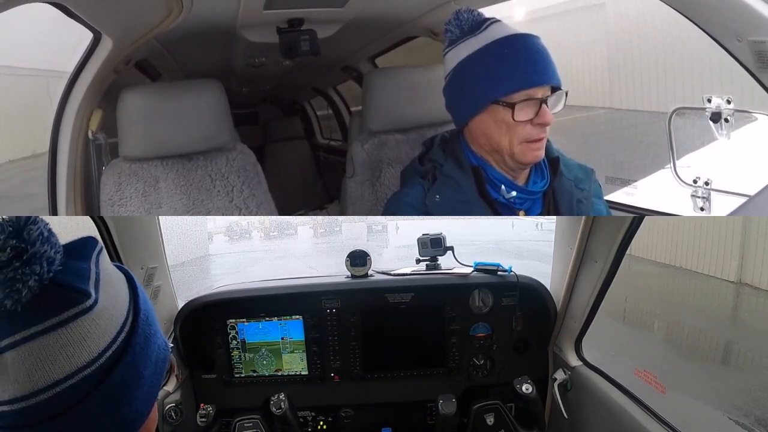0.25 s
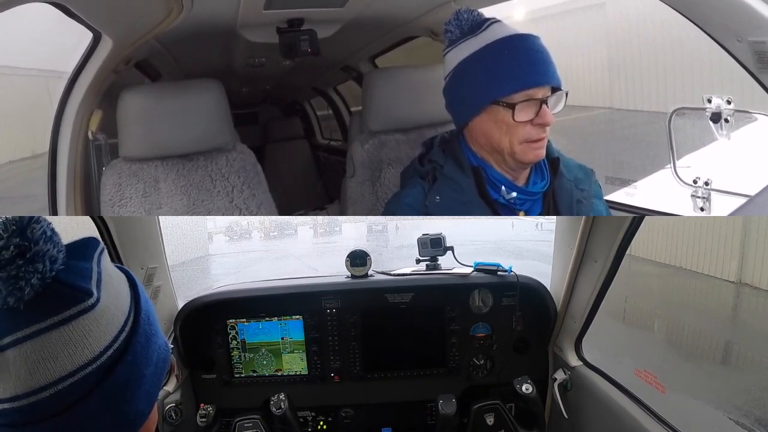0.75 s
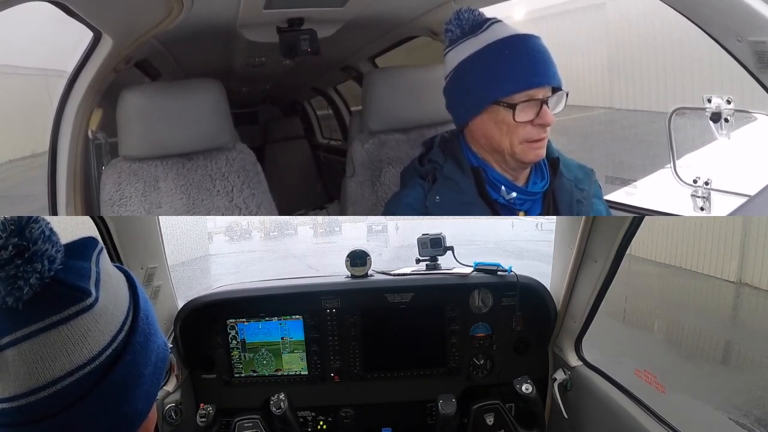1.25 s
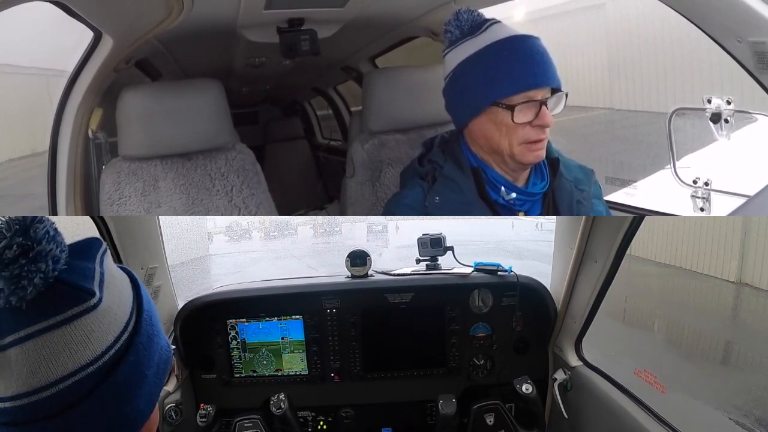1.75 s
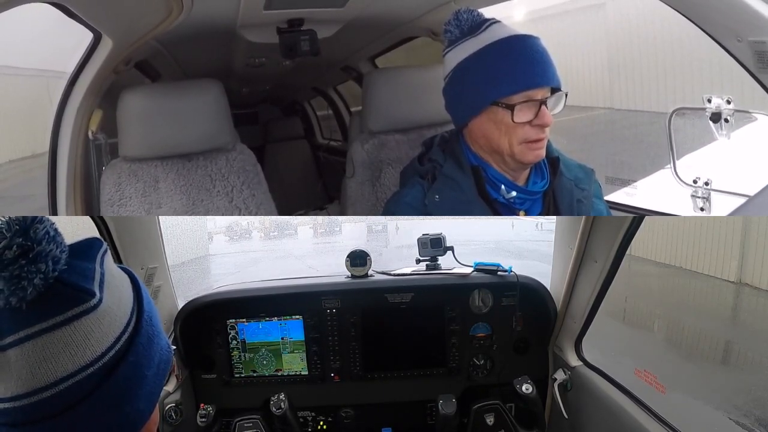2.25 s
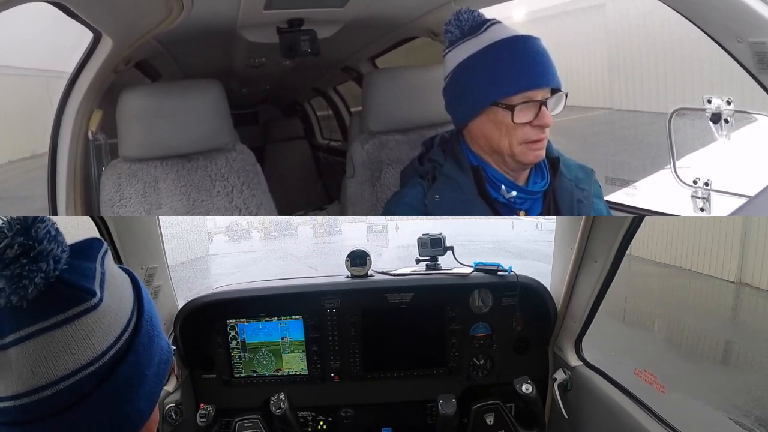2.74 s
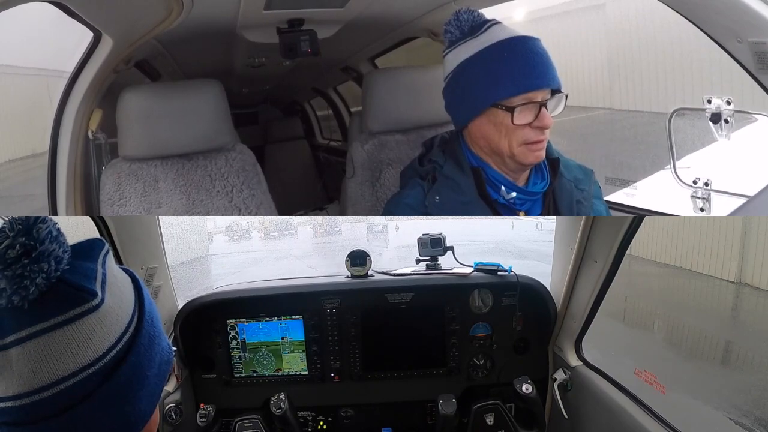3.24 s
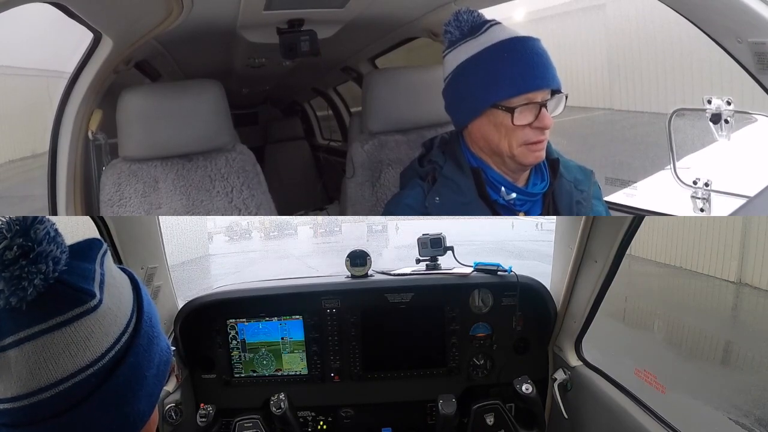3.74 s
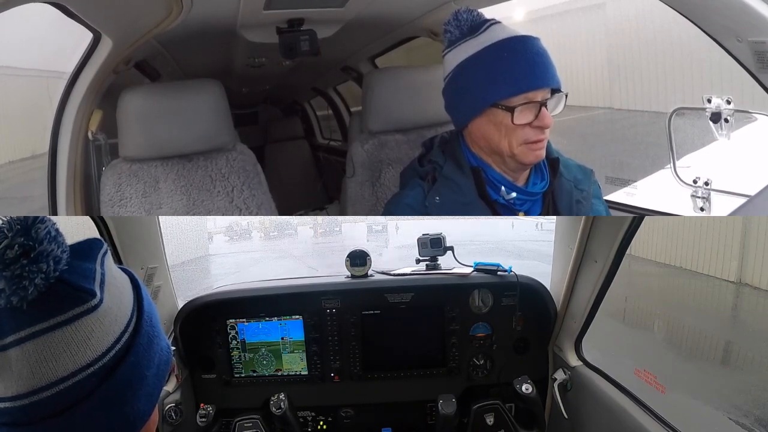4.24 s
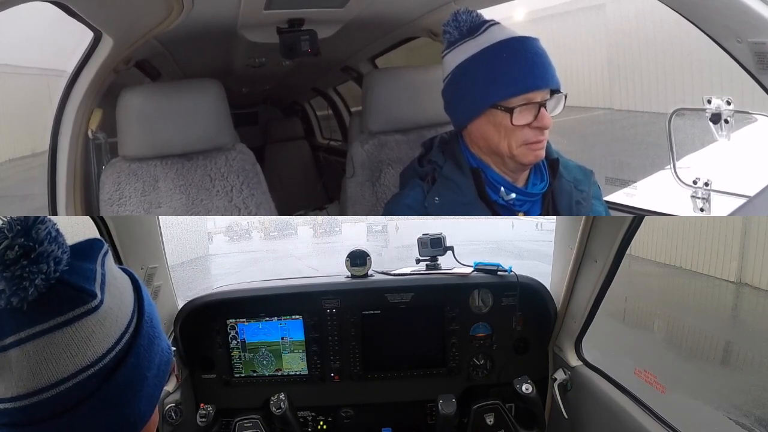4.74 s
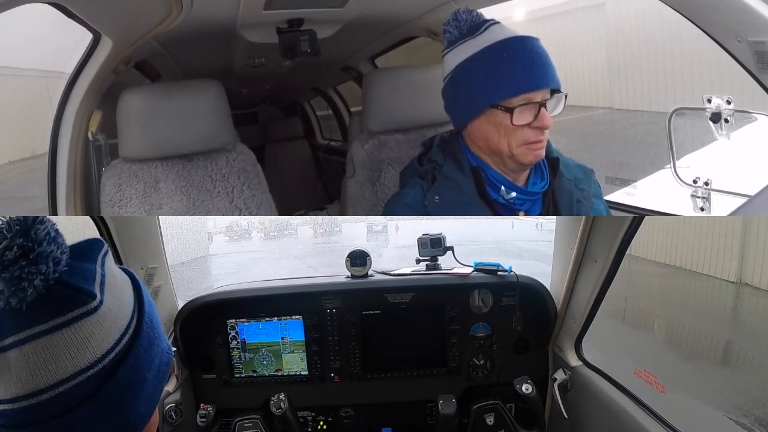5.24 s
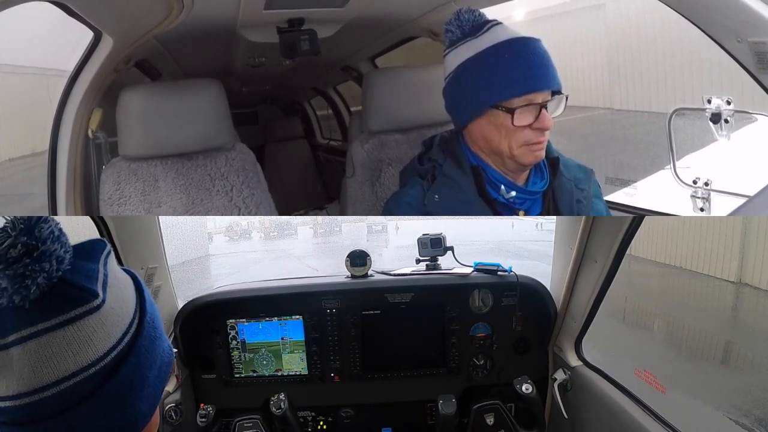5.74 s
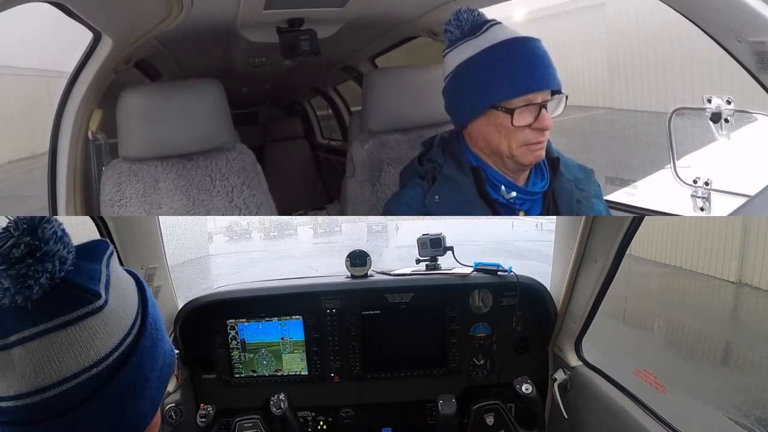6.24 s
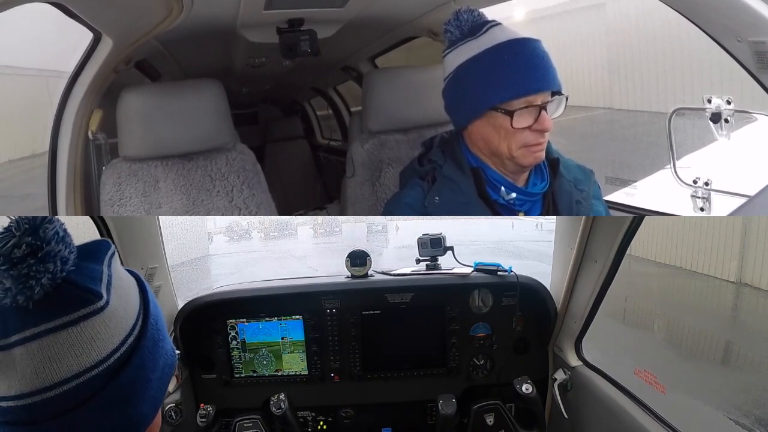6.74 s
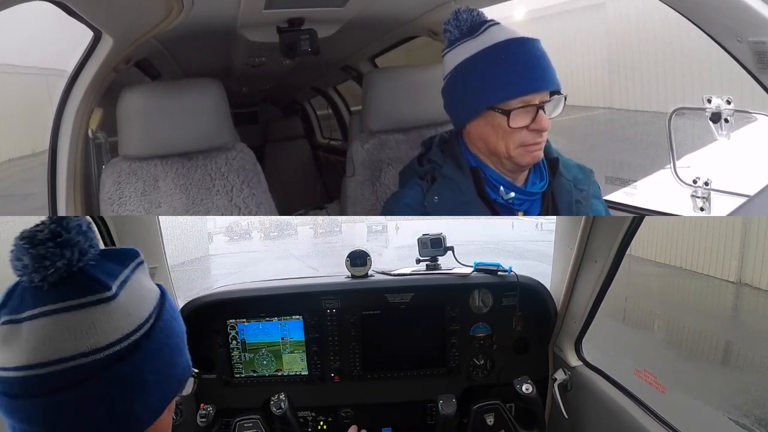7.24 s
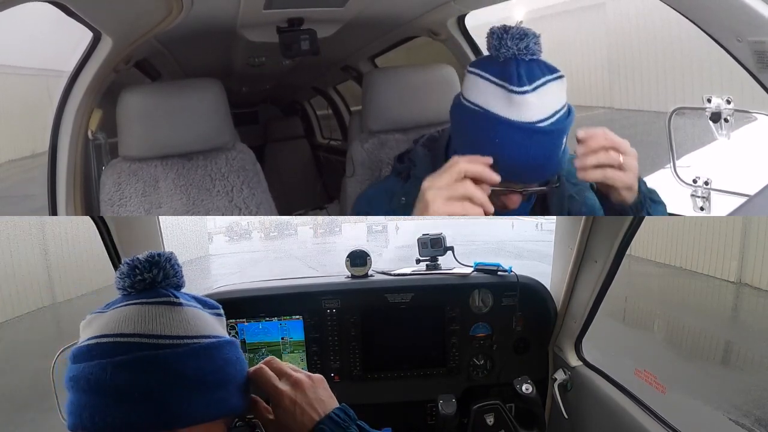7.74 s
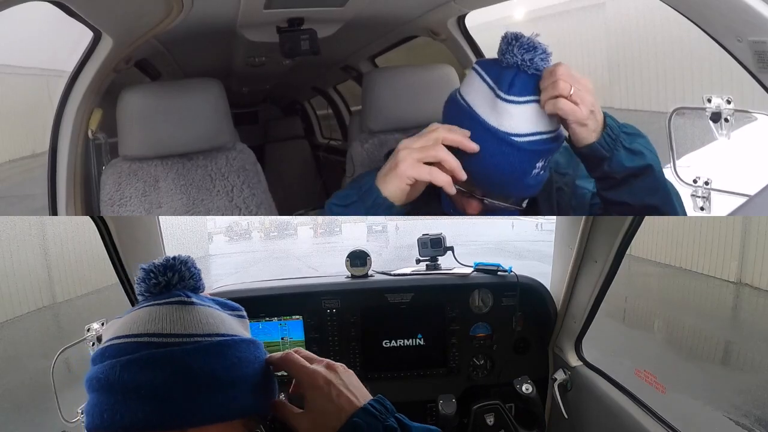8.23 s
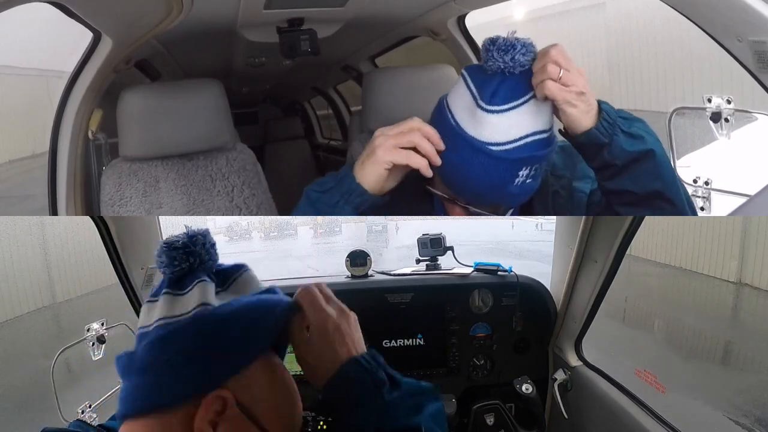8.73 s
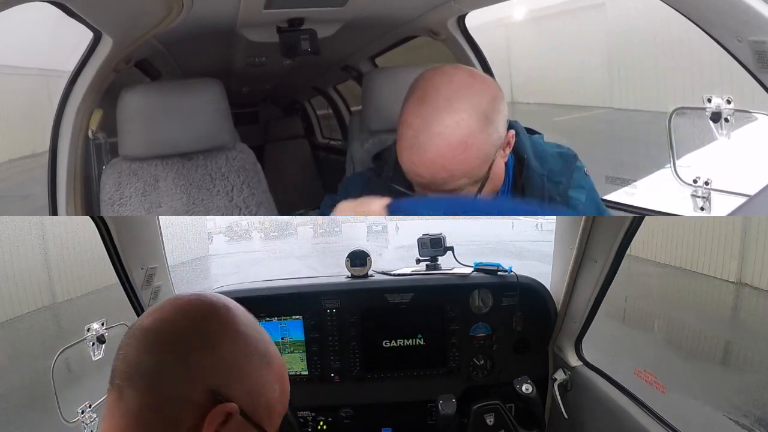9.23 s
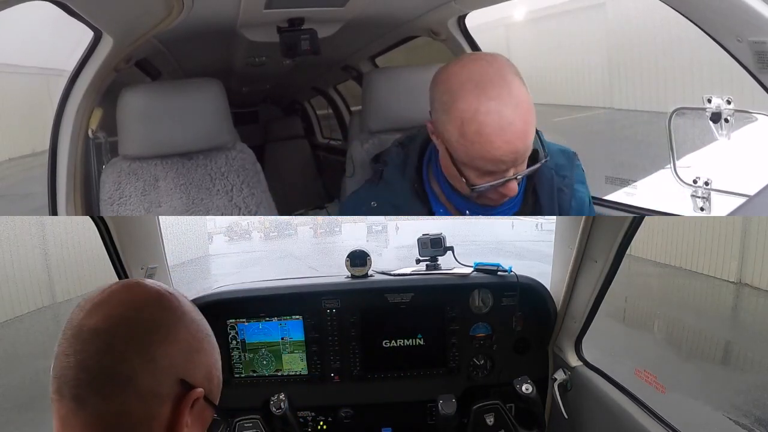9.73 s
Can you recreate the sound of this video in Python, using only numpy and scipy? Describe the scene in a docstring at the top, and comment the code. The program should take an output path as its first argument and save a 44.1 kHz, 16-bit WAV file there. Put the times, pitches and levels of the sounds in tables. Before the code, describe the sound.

Low, lumpy piston engine idle with propeller wash heard from a small plane's cabin, panels humming and rattling, with slight clothing rustles near the end.

```python
"""An uneven engine throb that repeats every twelve beats: a cold six-cylinder aircraft engine idles in a closed cockpit.
One cylinder skips every second cycle and a lazy one catches only now and then: orders of the beat plus single thumps.
Propeller wash and exhaust roar are shaped noise; panels, cabin air, trim and floor pan ring as resonances.
Loose things buzz as noise; short bright ticks are decaying sines; a nylon jacket rustles as grainy noise;
a touched knob clicks. Heard at two close microphone ports."""
import sys
import numpy as np
from scipy import signal
from scipy.fft import rfft, irfft, next_fast_len
from scipy.io import wavfile
from scipy.ndimage import uniform_filter1d, map_coordinates

SR = 44100
rng = np.random.default_rng(int(sys.argv[2]) if len(sys.argv) > 2 else 0)


def master_out(mix):
    """Clip the mix to full scale and print it as 16-bit PCM to the path in sys.argv[1]."""
    frames = np.transpose(np.atleast_2d(mix))
    ceiling = np.clip(frames, -1, 1)
    pcm = np.round(ceiling * 32767).astype(np.int16)
    wavfile.write(sys.argv[1], SR, pcm)


N = 440118


def amp(db):
    """Gain of a level in dB."""
    return 10 ** (np.asarray(db) / 20)


def unit(x):
    """x at rms 1."""
    return x / np.sqrt(np.mean(x ** 2) + 1e-20)


def along(points, hz):
    """(Hz, value) points interpolated on a log frequency axis."""
    f, v = np.transpose(points)
    return np.interp(np.log(hz + 1), np.log(f + 1), v)


def curves(rows):
    """One value per sample for each column after the time."""
    s, *cols = np.transpose(rows)
    return [np.interp(np.arange(N) / SR, s, c) for c in cols]


def wobble(rate_hz, size=1):
    """Smooth random curve, rate_hz (up to 40) knots a second, read every size samples."""
    knots = rng.standard_normal(int(N * 40 / SR) + 4)
    coarse = np.arange(0, N + 64, 64)
    curve = map_coordinates(knots, [coarse * min(rate_hz, 40) / SR])
    return np.interp(np.arange(0, N, size), coarse, curve)


def filtered(x, response):
    """x times a complex response of frequency; mirrored ends keep the edges free of steps."""
    edge = 4096
    x = np.pad(x, [(0, 0)] * (x.ndim - 1) + [(edge, edge)], mode="reflect")
    m = next_fast_len(x.shape[-1])
    spectrum = rfft(x, m) * response(np.fft.rfftfreq(m, 1 / SR))
    return irfft(spectrum, m)[..., edge:edge + N]


def modes(table):
    """Causal response of (center [Hz], width [Hz], level [dB]) resonances, alternating in sign."""
    def response(f):
        total = 0
        for k, (center, width, db) in enumerate(table):
            resonance = 1j * f * width / (center * center - f * f + 1j * f * width)
            total = total + (-1) ** k * amp(db) * resonance
        return total
    return response


# Left-right likeness of noise: (frequency [Hz], correlation [-1..1])
LIKENESS = [(130, 0.99), (300, 1), (640, 0.95), (1400, 0.9), (2500, 0.31), (6000, 0.34), (15000, 0.24)]


def rush(gain, noise=None):
    """Stereo noise of rms 1: alike at both ports in the bass, mostly unrelated in the treble."""
    def mid_side_gain(hz):
        turn = np.arccos(np.clip(along(LIKENESS, hz), -1, 1)) / 2
        return gain(hz) * [np.cos(turn), np.sin(turn)]
    noise = rng.standard_normal((2, N)) if noise is None else noise
    mid, side = filtered(noise, mid_side_gain)
    return unit(np.array([mid + side, mid - side]))


# Engine beat rate: (time [s], rate [beats/s])
BEAT_RATE = [(0, 52.42), (1.4, 52.503), (2, 52.835), (3.3, 52.336), (5, 50.744), (7.3, 49.49),
             (8.6, 49.223), (10, 49.698)]
START_BEAT = -.43


def engine_beats():
    """Integrates the beat rate into a running beat count; returns (beat, beats per second)."""
    speed_hz = curves(BEAT_RATE)[0]
    return START_BEAT + np.cumsum(speed_hz) / SR, speed_hz


# Firing pattern over two engine cycles: one entry per beat, 1 = always fires [0 or 1]
FIRES = [0, 1, 1, 0, 1, 1, 1, 1, 1, 0, 1, 1]
PAIR_BEATS, CYCLE_BEATS = len(FIRES), 6
# Hole left by one missing firing: (frequency [Hz], rms level per unit pattern weight [dB])
MISSING_FIRING = [(17, -34), (21, -43), (26, -38), (31, -32.5), (44, -32), (50, -35), (63, -32),
                  (68, -40.5), (75, -42), (85, -48), (100, -49)]
# Whole multiples of the beat as the cabin passes them: (frequency [Hz], rms level [dB])
BEAT_ORDERS = [(49, -19), (53, -18), (99, -25), (105, -34), (148, -42), (154, -39), (158, -42), (198, -44),
               (210, -46), (250, -53), (262, -59), (298, -52), (315, -56), (348, -59), (367, -52),
               (395, -54), (420, -53), (470, -58), (545, -65), (592, -58), (630, -61), (650, -63),
               (690, -69), (735, -62), (745, -55), (756, -58), (770, -64), (788, -55)]
# Orders halfway between beats, as alternate cylinder banks differ: (frequency [Hz], rms level [dB])
HALF_ORDERS = [(74, -27), (79, -31), (124, -44), (131, -43), (173, -59), (184, -53), (222, -60), (236, -52)]
# Missing firings and catches grow with speed about the reference rate.
EFFORT_DB_PER_HZ, REFERENCE_HZ = .6, 51


def throb(beat, speed_hz):
    """Engine orders; the firing pattern sets the size and sign of those between whole and half beats."""
    step = 8
    beat, speed_hz = beat[::step], speed_hz[::step]
    effort_db = EFFORT_DB_PER_HZ * (speed_hz - REFERENCE_HZ)
    pattern = np.fft.fft(FIRES).real
    orders = [k for k in range(4, 24) if k % PAIR_BEATS]
    orders += [30, 42, 54] + [PAIR_BEATS * k for k in range(1, 16)]
    out = np.zeros(len(beat))
    for order in orders:
        multiple, place = order / PAIR_BEATS, order % PAIR_BEATS
        hz = multiple * speed_hz
        if place == 0:
            steady = amp(along(BEAT_ORDERS, hz))
        elif place == PAIR_BEATS // 2 and multiple > 1:
            steady = amp(along(HALF_ORDERS, hz))
        else:
            steady = pattern[place] * amp(along(MISSING_FIRING, hz) + effort_db)
        level = steady * amp(.4 * np.sqrt(multiple) * wobble(2.5, size=step))
        trail_rad = .45 * (multiple - 1) ** 2 if multiple % 1 == 0 else 3.5 / order
        lag_rad = trail_rad + .03 * multiple * wobble(3, size=step)
        out += np.sqrt(2) * level * np.cos(2 * np.pi * multiple * beat - lag_rad)
    return signal.resample_poly(out, step, 1, padtype="line")[:N]


# Cycles in which the lazy cylinder catches: cycle index [engine cycles]
CATCHES = [1, 3, 5, 6, 8, 10, 12, 14, 15, 17, 19, 21, 23, 25, 26, 27, 30, 32, 33, 35, 37, 39, 40, 42, 43,
           45, 47, 50, 53, 56, 59, 61, 64, 66, 67, 69, 71, 73, 76, 78, 80, 82, 84]
# Weaker catches: (cycle index [engine cycles], level relative to a full catch [dB])
PARTIAL_CATCHES = [(5, -11), (14, -10), (26, -9), (32, -3), (39, -7), (42, -3), (66, -2)]
LAZY_BEAT = 3  # place in the engine cycle
CATCH_DB = -8.3  # full catch at the reference rate


def unevenness(beat, speed_hz):
    """Each beat gets a push of chance size; a catch of the lazy cylinder adds one swing of cabin air."""
    push = rng.standard_normal(600)[np.round(beat).astype(int)] * np.cos(np.pi * beat) ** 2
    pushes = amp(-36) * unit(filtered(push, lambda hz: hz ** 2 / (hz ** 2 + 30 ** 2)))
    at = np.searchsorted(beat, LAZY_BEAT + CYCLE_BEATS * np.array(CATCHES))
    partial_db = np.array([dict(PARTIAL_CATCHES).get(k, 0) for k in CATCHES])
    effort_db = EFFORT_DB_PER_HZ * (speed_hz[at] - REFERENCE_HZ)
    impulses = np.bincount(at, amp(CATCH_DB + effort_db + partial_db), N)
    t = np.arange(-.04, .04, 1 / SR)
    thump = np.exp(-(t / .0123) ** 2) * np.cos(2 * np.pi * 48 * t - .5)
    return pushes + signal.fftconvolve(impulses, thump, "same")


# Roar power that returns with every pair of engine cycles: (frequency [Hz], share [0..1])
RETURN_SHARE = [(40, 0), (90, .45), (140, .5), (200, .4), (400, .4), (560, .27), (800, .13), (1100, .1),
                (1800, 0)]
RENEW_S = 3


def returning(beat):
    """Two white noises of which a share repeats with every pair of engine cycles, slowly renewed."""
    cells = 2048
    pairs, age = beat / PAIR_BEATS, np.arange(N) / SR / RENEW_S
    patterns = rng.standard_normal((2, int(age[-1]) + 2, cells))
    cell, old = (pairs % 1 * cells).astype(int), age.astype(int)
    turn = np.pi / 2 * (age % 1)  # equal-power crossfade to the next pattern
    again = np.cos(turn) * patterns[:, old, cell] + np.sin(turn) * patterns[:, old + 1, cell]
    again = again * np.sqrt(cells * (pairs[-1] - pairs[0]) / N)  # held cells to white-noise density
    repeated = filtered(again, lambda hz: np.sqrt(along(RETURN_SHARE, hz)))
    fresh = rng.standard_normal((2, N))
    return repeated + filtered(fresh, lambda hz: np.sqrt(1 - along(RETURN_SHARE, hz)))


# Roar course: (time [s], level [dB])
ROAR_LEVEL = [(0, -36.5), (3.45, -36.5), (3.85, -38.5), (5, -38.5), (6.1, -36.5), (6.9, -38), (7.6, -37),
              (9.2, -38.5)]
# Spectrum of propeller wash and roar: (frequency [Hz], relative density [dB per Hz])
WASH_SPECTRUM = [(3, -11), (8, 2), (12, -1), (20, -22.5), (45, -23), (70, -26), (95, -19), (117, -31),
                 (140, -27), (170, -34), (200, -30), (260, -31.5), (400, -33), (680, -42), (1000, -46),
                 (1250, -52), (2000, -59.5)]
# Panel resonances: (center [Hz], width [Hz], relative density [dB])
PANEL_MODES = [(607, 30, -1.5), (726, 30, -4.5), (814, 18.5, 1.5), (951, 7.4, 2.5), (1048, 20.4, -3),
               (1072, 9.7, 1), (1125, 13.4, -10.5), (1472, 30, -13.5)]
# Air modes of the cabin: (center [Hz], width [Hz], relative level [dB])
CABIN_MODES = [(151.4, 19, 4), (207.8, 9.5, 4.5), (294, 15, -3.5), (368, 25, -2)]


def roar_swing_db():
    """Deviation of the roar course from its mean in dB."""
    roar_db = curves(ROAR_LEVEL)[0]
    return roar_db - roar_db.mean()


def roar(beat):
    """Wash noise under a roar and panel hum that swell with the beat; cabin air booms along."""
    level = amp(curves(ROAR_LEVEL)[0] + 0.63 * wobble(9))
    swell_db = 1.35 * np.cos(2 * np.pi * (beat - .6))
    swell_db += 1.22 * np.cos(2 * np.pi * (beat - .9) / 3)
    swell_db += 0.22 * np.cos(2 * np.pi * (beat - .9) / CYCLE_BEATS)
    body_spectrum = WASH_SPECTRUM + [(4000, -79), (16000, -110)]

    def low(hz):  # power split between wash and roar body
        return 1 / (1 + (hz / 130) ** 6)

    def boom_gain(hz):
        return modes(CABIN_MODES)(hz) * hz ** 2 / (hz ** 2 + 120 ** 2)

    wash = rush(lambda hz: amp(along(WASH_SPECTRUM, hz)) * np.sqrt(low(hz)), returning(beat))
    body = rush(lambda hz: amp(along(body_spectrum, hz)) * np.sqrt(1 - low(hz)), returning(beat))
    drive = returning(beat)
    hum = np.zeros((2, N))
    for mode in PANEL_MODES:
        _, width_hz, db = mode
        hum += amp(db + 0.97 * wobble(4)) * np.sqrt(width_hz) * rush(modes([mode]), drive)
    hum = unit(hum)
    boom = rush(boom_gain, drive)
    swelling = amp(swell_db) * (amp(0.01) * body + amp(-11.5) * hum)
    return amp(-19.0) * wash + level * (amp(-7.0) * boom + swelling)


# Jolts within two engine cycles: (place [beats], nominal strength [dB])
JOLTS = [(1.7, 19.5), (4.6, 17), (5.4, 8), (8.5, 15), (10.6, 11.5)]


def jolts(beat):
    """dB by which jolts stir loose things: quick rise, slower fade, new strength every time."""
    stir_db = np.zeros(N)
    for at, db in JOLTS:
        chance = rng.uniform(.4, 1.4, 64)[((beat - at) // PAIR_BEATS).astype(int) + 2]
        stir_db += db * chance * np.exp(-((beat - at) % PAIR_BEATS) / 1.17)
    return uniform_filter1d(stir_db, size=350)


# Sizzle spectrum: (frequency [Hz], relative density [dB per Hz])
SIZZLE_SPECTRUM = [(880, -27), (1500, -15), (1550, -26), (2020, -11), (3610, -11), (4100, -12.5),
                   (6980, -11), (8590, -12.5), (14600, -27), (15800, -42)]
# Loose trim resonances: (center [Hz], width [Hz], relative level [dB])
TRIM_MODES = [(1446, 57, -5.5), (1815, 62, -10), (2463, 55, -12.5), (2630, 80, -12), (2930, 210, -11.5),
              (3500, 500, -8.5), (5110, 710, -10.5), (7560, 300, -29), (8400, 280, -15.5)]
BUZZ_DB, BUZZ_FOLLOWS = -59, 0.74  # base level; share of the roar's dB swings followed


def buzz(beat):
    """Sizzle noise stirred by jolts in the treble, and chatter: bursts that each excite one trim mode."""
    level = amp(BUZZ_DB + BUZZ_FOLLOWS * roar_swing_db())
    stir_db = jolts(beat)

    def high(hz):
        return 0.26 / (1 + (4500 / (hz + 1)) ** 4) / (1 + (hz / 11500) ** 4)

    sizzle = rush(lambda hz: amp(along(SIZZLE_SPECTRUM, hz)))
    sizzle = sizzle + (amp(stir_db) - 1) * filtered(sizzle, high)
    chatter = np.zeros((2, N))
    for mode in TRIM_MODES:
        bursts = amp(.5 * stir_db + 8.7 * np.tanh(wobble(30)))
        chatter += amp(mode[2]) * bursts * rush(modes([mode]))
    return level * (sizzle + amp(-3.5) * chatter)


# Loudest exhaust blows of two engine cycles: (place [beats], impulse level [dB])
BLOWS = [(1.7, 10), (4.4, 16), (6.4, 9), (7.4, 13), (8.8, 10), (10.6, 16)]
# Floor pan over the exhaust: (center [Hz], width [Hz], level [dB])
FLOOR_MODES = [(205, 22, 0), (290, 25, -4), (375, 35, -6), (560, 70, -15)]
BLOW_SCATTER_DB, BLOW_SCATTER_BEATS = 2, .02


def barks(beat):
    """Stronger cylinders thump the floor pan at their place in each cycle pair, following the roar level."""
    at, db = np.transpose(BLOWS)
    starts = PAIR_BEATS * np.arange(beat[-1] // PAIR_BEATS)[:, None]
    chance = rng.standard_normal((2, len(starts), len(at)))
    where = np.searchsorted(beat, starts + at + BLOW_SCATTER_BEATS * chance[0])
    strength = amp(db + BLOW_SCATTER_DB * chance[1])
    blows = np.bincount(where.ravel(), strength.ravel(), N)[:N]

    def floor_gain(hz):
        return modes(FLOOR_MODES)(hz) * (1j * hz / (170 + 1j * hz)) ** 2

    return filtered(blows * amp(roar_swing_db()), floor_gain)


# Short bright ticks: a loose part, and at 9.76 s likely the nylon jacket:
# (time [s], level [dB], brightness [dB per octave])
TICK_EVENTS = [(0.0440, -46, -5), (0.2706, -40, -9), (0.5021, -42, -9), (1.5885, -37, -6),
               (1.8704, -45, -6), (2.1014, -44, -6), (2.5544, -38.5, -6), (2.7819, -38, -8),
               (3.267, -32, -2), (3.669, -43, 1), (4.1657, -43, -7), (4.5952, -33, -1), (4.596, -30, -20),
               (5.129, -34, 0), (5.3368, -36.5, -5), (5.619, -41, -14), (6.02, -38.5, 0), (6.2939, -44, 1),
               (7.042, -30, 2), (7.2568, -43, -8), (7.7092, -42, -5), (8.227, -46, -6), (8.7128, -40, -6),
               (9.4567, -42, -3), (9.6538, -36, -6), (9.7595, -39, 5), (9.764, -40, 10)]
# Ring of a tick: (frequency [Hz], level [dB], t60 [s])
TICK_RING = [(6500, -8, .005), (7300, -3, .006), (8100, 0, .006), (8900, 0, .005), (10100, -7, .004),
             (11500, -4, .005), (13400, -7, .004), (14800, -12, .003)]
TICK_MIDDLE_HZ = 8100  # brightness pivot
RATTLE_DB, RATTLE_T60_S, RATTLE_HZ, RATTLE_WIDTH_HZ = -7, .09, 8000, 4000


def ticks():
    """Each tick rings as decaying sines and leaves a faint band of decaying noise."""
    ring, rattle = np.zeros((2, N + SR)), np.zeros((2, N + SR))
    t = np.arange(SR // 10) / SR
    attack = 1 - np.exp(-t / 0.00025)
    for s, db, bright in TICK_EVENTS:
        span = slice(round(s * SR), round(s * SR) + len(t))
        for hz, level_db, t60_s in TICK_RING:
            phase = rng.uniform(0, 2 * np.pi) + rng.normal(0, .9, (2, 1))
            tilt_db = bright * np.log2(hz / TICK_MIDDLE_HZ) + rng.normal(0, 1.8)
            fade = amp(db + level_db + tilt_db - 60 * t / t60_s) * attack
            ring[:, span] += fade * np.sin(2 * np.pi * hz * t + phase)
        decay = amp(db + RATTLE_DB - 60 * t / RATTLE_T60_S)
        rattle[:, span] += decay * rng.standard_normal((2, len(t)))
    band = modes([(RATTLE_HZ, RATTLE_WIDTH_HZ, 0)])
    return ring[:, :N] + filtered(rattle[:, :N], lambda hz: band(hz) ** 2)


# Jacket strokes: (start [s], swell [s], release [s], level [dB])
STROKES = [(7.21, 0.26, 0.1, -52.5), (9.32, .08, 0.079, -51.5), (9.52, 0.185, .025, -45.5),
           (9.72, .04, 0.2, -56)]
# Nylon hiss spectrum: (frequency [Hz], relative density [dB per Hz])
NYLON_SPECTRUM = [(1470, -36), (2100, -4), (3150, -9), (4500, -9), (8730, -6), (15100, -15), (15800, -17)]
GRIP_S, GRIP_SHARE = 0.069, 0.45  # time to reach this share of the stroke's peak


def jacket():
    """Nylon slides on nylon: a grainy hiss that grips, swells and lets go with each stroke."""
    t = np.arange(N) / SR
    stroke = np.zeros(N)
    for s, swell_s, release_s, db in STROKES:
        corners_s = np.cumsum([s, GRIP_S, swell_s, release_s])
        stroke += amp(db) * np.interp(t, corners_s, [0, GRIP_SHARE, 1, 0])
    grains_db = rng.exponential(1.2, N // 64 + 1).repeat(64)[:N]
    grain = amp(1.5 * wobble(40) + uniform_filter1d(grains_db, size=40) - 2.5)
    return stroke * grain * rush(lambda hz: amp(along(NYLON_SPECTRUM, hz)))


# Touches of a knob: (time [s], impulse level [dB])
KNOB_TOUCHES = [(7.4596, -37), (7.4802, -33)]
# Knob resonances: (center [Hz], width [Hz], level [dB])
KNOB_MODES = [(1050, 500, 31), (1600, 700, 27), (2600, 1000, 21), (3500, 900, 14)]


def knob():
    """Each touch is an impulse through the knob's broad resonances: a thin click."""
    s, db = np.transpose(KNOB_TOUCHES)
    return filtered(np.bincount((s * SR).astype(int), amp(db), N), modes(KNOB_MODES))


def scene():
    """Sum of all sources at the two ports."""
    beat, speed_hz = engine_beats()
    engine = throb(beat, speed_hz) + unevenness(beat, speed_hz)
    airframe = roar(beat) + buzz(beat) + barks(beat)
    return engine + airframe + ticks() + jacket() + knob()


# Port sensitivity: (frequency [Hz], left minus right [dB])
PORT_LEAN = [(30, -1.3), (60, -2.1), (180, -2.5), (550, -1), (1650, -1.3), (4970, -1), (15000, 1.5)]
LEAD_S = 4 / SR  # left port leads in the treble
TOP_HZ = 15780


def record(dry):
    """Ports differ in level and treble arrival; peaks round off, ends fade, the band stops at TOP_HZ."""
    side = np.array([[.5], [-.5]])

    def port_gain(hz):
        lead_s = LEAD_S / (1 + (2200 / (hz + 1)) ** 4)  # bass reaches both via the airframe at once
        return amp(side * along(PORT_LEAN, hz)) * np.exp(2j * np.pi * hz * side * lead_s)

    ports = filtered(dry, port_gain)
    ports = ports / (1 + np.abs(ports / 0.86) ** 5) ** (1 / 5)
    from_end = np.minimum(np.arange(N), np.arange(N)[::-1])
    fade = np.minimum(1, from_end / (.008 * SR))
    return filtered(ports * fade, lambda hz: hz < TOP_HZ)


dry = scene()
out = record(dry)
master_out(out)
```